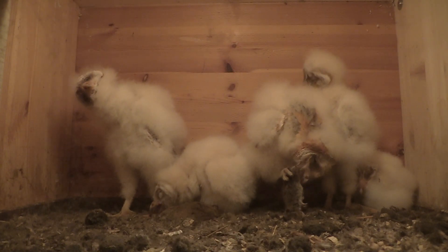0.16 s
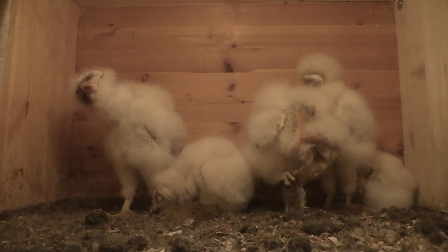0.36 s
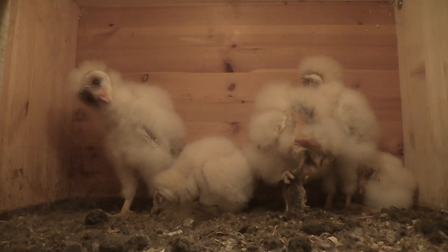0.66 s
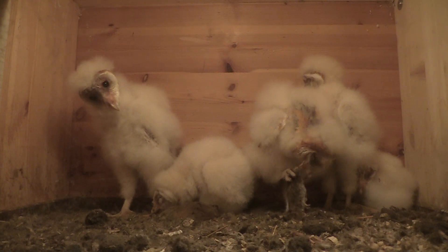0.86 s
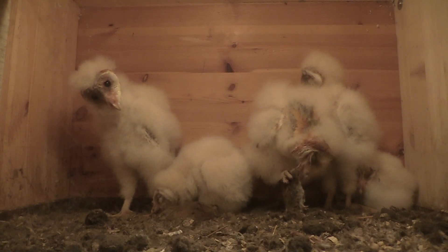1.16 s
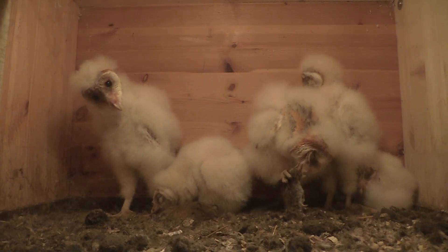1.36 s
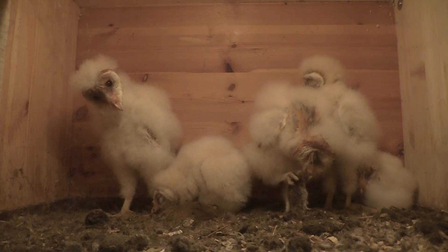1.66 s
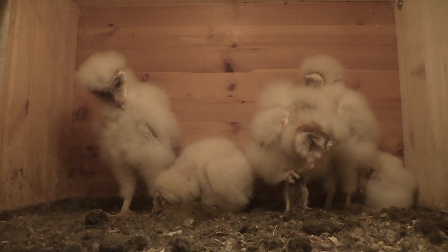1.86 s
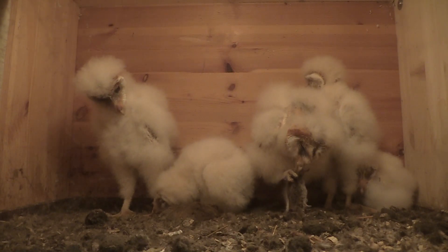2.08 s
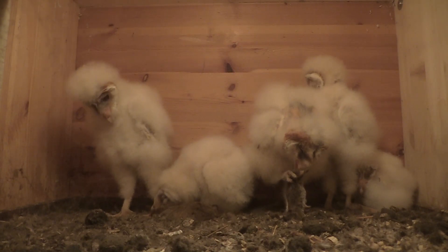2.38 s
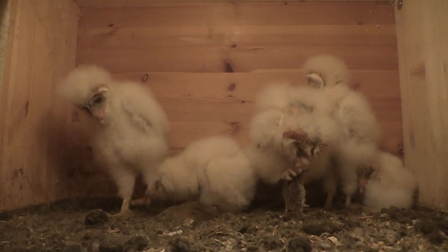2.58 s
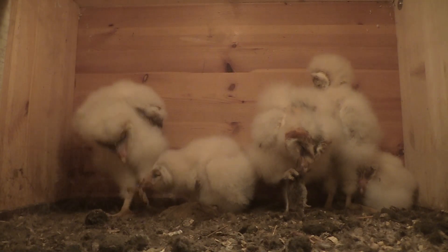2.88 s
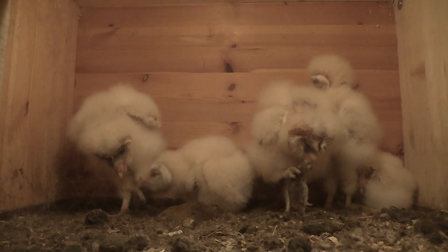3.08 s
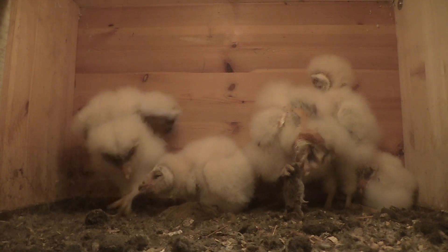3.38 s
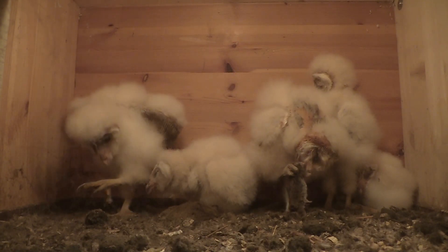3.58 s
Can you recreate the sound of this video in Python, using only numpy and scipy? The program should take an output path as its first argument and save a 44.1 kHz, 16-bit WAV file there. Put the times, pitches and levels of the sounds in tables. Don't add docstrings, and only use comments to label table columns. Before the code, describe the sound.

Raspy owl chick hiss ends within half a second, then low hum, buzz and muffled thumps.

```python
import sys
import numpy as np
from scipy import signal
from scipy.fft import rfft, irfft
from scipy.io import wavfile
from scipy.ndimage import uniform_filter1d

SR = 44100
rng = np.random.default_rng(int(sys.argv[2]) if len(sys.argv) > 2 else 0)


def to_wav(sig):
    pcm = np.clip(np.atleast_2d(sig), -1, 1) * 32767
    pcm = np.round(pcm).astype(np.int16)
    wavfile.write(sys.argv[1], SR, pcm.T)


def rack_gain(trim_db):
    fader = np.asarray(trim_db, float)
    return 10 ** (fader / 20)


N = 164934


def evened(x):
    return x / np.sqrt(np.mean(x ** 2) + 1e-20)


def drift(rate_hz, size):
    return evened(signal.lfilter(*signal.butter(1, rate_hz, fs=SR), rng.standard_normal(size)))


def coloured(points):
    point_hz, point_db = np.transpose(points)
    bin_hz = np.fft.rfftfreq(N, 1 / SR)
    gain_db = np.interp(np.log(bin_hz + 1), np.log(point_hz + 1), point_db)
    return evened(irfft(rfft(rng.standard_normal(N)) * rack_gain(gain_db), N))


def resonate(x, hz, width):
    carrier = np.exp(2j * np.pi * np.cumsum(hz * np.ones(len(x))) / SR)
    decay = np.exp(-np.pi * width / SR)
    return 2 * (carrier * signal.lfilter([1 - decay], [1, -decay], x / carrier)).real


def chick():
    # time in seconds, effort in dB, beak opening from 0 (shut) to about 1 (open), brightness in dB
    hiss_course = [
        (0, -48.5, .95, 0),
        (.09, -48.5, .95, 0),
        (.115, -45.5, .9, 0),
        (.22, -45.5, 1.08, 0),
        (.355, -44, .8, 0),
        (.387, -44, .1, -1.5),
        (.405, -48.5, .35, -5),
        (.47, -55.5, .35, -8),
        (.497, -75, .35, -8),
    ]
    # resonance in Hz, width in Hz, level in dB with the beak open, change in dB when it shuts.
    throat = [(1600, 180, -12, 3.5), (2975, 120, -10.5, 4), (3150, 180, -9.5, 7), (3466, 170, -3.5, 12),
              (3840, 60, -1.1, -9), (4020, 220, -5.5, 5), (4990, 380, -8.5, -6), (6050, 150, -13, 11),
              (6410, 240, -12.5, -2), (7230, 150, -13.5, 14), (7600, 120, -7, -20), (8250, 350, -15, -3),
              (8780, 150, -11, 3), (9560, 250, -14.5, 10)]
    rasp_hz, rasp_wobble, rasp_depth = 215, .4, .55
    t = np.arange(SR // 2) / SR
    when, *controls = np.transpose(hiss_course)
    effort_db, beak, bright = (np.interp(t, when, c) for c in controls)

    puff_turns = np.cumsum(rasp_hz * np.exp(rasp_wobble * drift(60, len(t)))) / SR
    puffs = 2 * np.exp(-(puff_turns % 1) / .35)
    air = evened((1 - rasp_depth + rasp_depth * puffs) * rng.standard_normal(len(t)))

    breath_band = signal.butter(4, (3000, 10300), "band", fs=SR, output="sos")
    voice = rack_gain(-6 + bright) * evened(signal.sosfilt(breath_band, air))

    for k, (hz, width, open_db, shut_db) in enumerate(throat):
        path = hz * (1 + .004 * drift(3.2, len(t)))
        ring = evened(resonate(resonate(air, path, width), path, 2.5 * width))
        ring = ring / np.sqrt(uniform_filter1d(ring ** 2, size=round(.03 * SR)) + 0.09)
        tilt_db = bright * np.log2(hz / throat[1][0])
        flutter_db = 1.5 * drift(18, len(t))
        voice = voice + (-1) ** k * ring * rack_gain(open_db + shut_db * (1 - beak) + tilt_db + flutter_db)
    return np.pad(rack_gain(effort_db) * evened(voice), (0, N - len(t)))


def outside():
    rumble_spectrum = [(15, -1.5), (28, -4), (70, -4), (270, -18.5), (600, -18), (1150, -24.5), (1380, -30),
                       (3000, -36), (15500, -47)]
    # cavity mode in Hz, width in Hz, level in dB.
    box_modes = [(89.7, 8.3, -52.5), (156, 28, -55), (342, 14, -57), (406, 9.9, -58.5), (427, 21, -55.5),
                 (618, 39, -61.5), (662.4, 79, -54), (709, 13.8, -58), (904, 85, -56), (974, 61, -59)]
    white = rng.standard_normal(N)
    ringing = np.zeros(N)
    for hz, width, mode_db in box_modes:
        mode = resonate(resonate(white, hz, width), hz, 2 * width)
        ringing += rack_gain(mode_db) * evened(mode)
    swell_db = .4 * drift(0.5, N)
    return rack_gain(-40.5 + swell_db) * coloured(rumble_spectrum) + ringing


def whine():
    pitch_hz = 1237 + 2.5 * drift(1.12, N)
    return rack_gain(-67) * np.sqrt(2) * np.sin(2 * np.pi * np.cumsum(pitch_hz) / SR)


def mains_buzz():
    # time in seconds, spikes per second.
    mains_rate = [(0, 99.967), (.7, 99.977), (3.74, 99.9854)]
    first_spike_s, skew_s, spike_width_s = .00755, 7.5e-6, 1.45e-5
    t = np.arange(N) / SR
    half_cycles = np.cumsum(np.interp(t, *np.transpose(mains_rate))) / SR - first_spike_s * mains_rate[0][1]
    nearest = np.round(half_cycles)
    sign = 2 * (nearest % 2) - 1
    late_s = (half_cycles - nearest) / mains_rate[1][1] - sign * skew_s
    height = 1 + .05 * rng.standard_normal(N // 400)[nearest.astype(int) + 1]
    return rack_gain(-30.6) * sign * height * np.exp(-.5 * (late_s / spike_width_s) ** 2)


def feet():
    # start in seconds, peak in dB, pitch in Hz, length in seconds.
    thumps = [(.068, -29, 94, 0.09), (.338, -32, 96, 0.065), (0.468, -36, 67.4, 0.038),
              (0.736, -29.5, 90, 0.05), (1.491, -35, 91.3, .03), (1.846, -31.5, 86.8, 0.053),
              (2.055, -32.5, 84, 0.029), (2.275, -38, 99, 0.032), (2.405, -31.5, 84, .065),
              (2.608, -35, 93.5, .04), (2.832, -31, 79, 0.014), (3.099, -36.5, 81, 0.039),
              (3.722, -28.5, 99, 0.095)]
    rise_s, sag_db, t60_s = .012, -5, .1
    out = np.zeros(N + SR)
    t = np.arange(SR // 4) / SR
    for start_s, peak_db, hz, length_s in thumps:
        rise = np.minimum(t / rise_s, 1)
        held_db = sag_db * np.minimum(t / length_s, 1)
        decay_db = -60 * np.maximum(t - length_s, 0) / t60_s
        turns = np.cumsum(hz * np.exp(.05 * drift(42, len(t)))) / SR
        push = rack_gain(-9) * np.sin(.7 * np.pi * turns)
        panel = np.sin(2 * np.pi * turns) + push
        at = round(start_s * SR)
        out[at:at + len(t)] += rack_gain(peak_db) * rise * rack_gain(held_db + decay_db) * panel
    return out[:N]


def scene():
    microphone = chick() + outside() + whine() + mains_buzz() + feet()
    return np.tile(microphone, (2, 1))


def low_pass(x):
    return signal.sosfilt(signal.butter(12, 15670, fs=SR, output="sos"), x)


def record(dry):
    # frequency in Hz, density in dB per Hz.
    amplifier_spectrum = [(12, -23), (20, -9), (333, -8.5), (986, -16.5), (1200, -13.5), (1820, -14.5),
                          (7740, -13.5), (15500, -16.5)]
    hiss = rack_gain(-53.5) * np.array([coloured(amplifier_spectrum), coloured(amplifier_spectrum)])
    return low_pass(dry + hiss)


dry = scene()
out = record(dry)
to_wav(out)
```